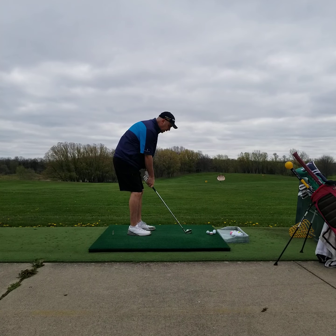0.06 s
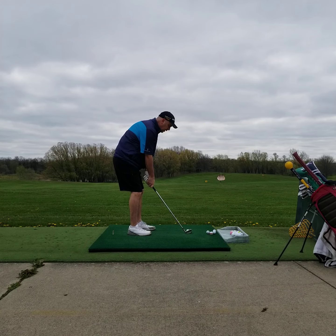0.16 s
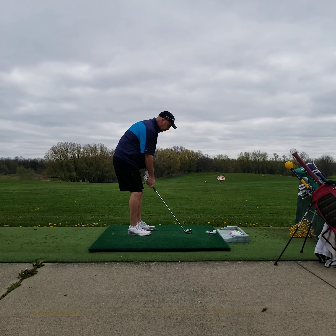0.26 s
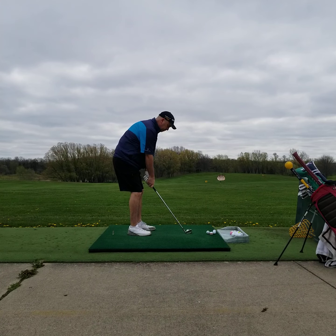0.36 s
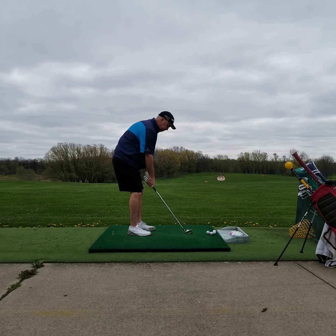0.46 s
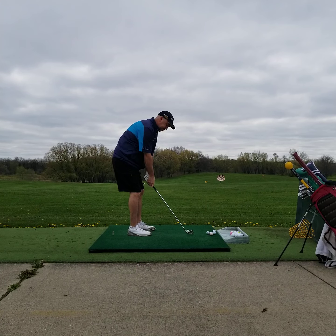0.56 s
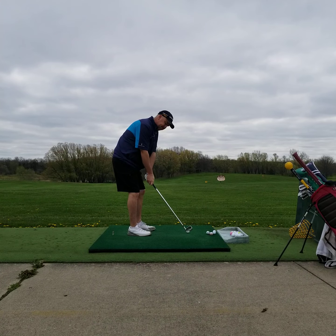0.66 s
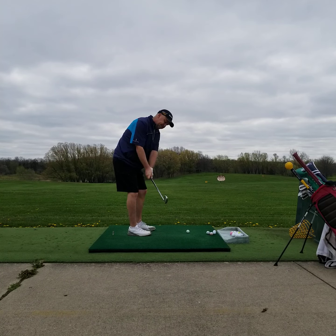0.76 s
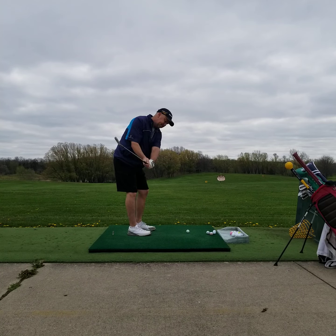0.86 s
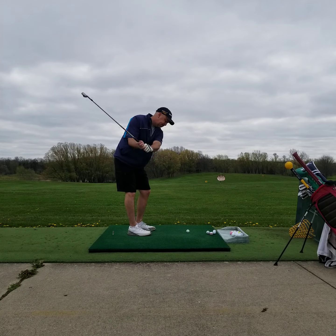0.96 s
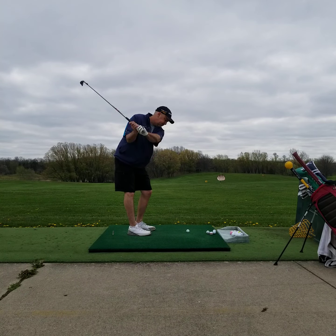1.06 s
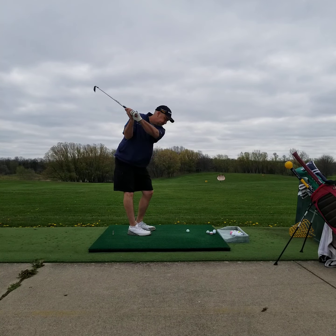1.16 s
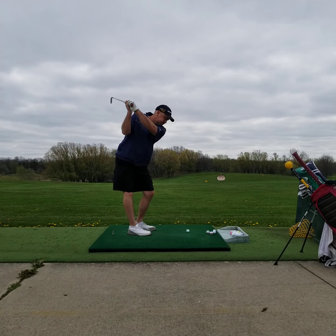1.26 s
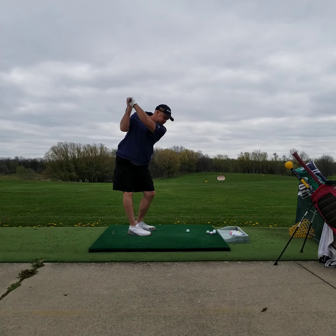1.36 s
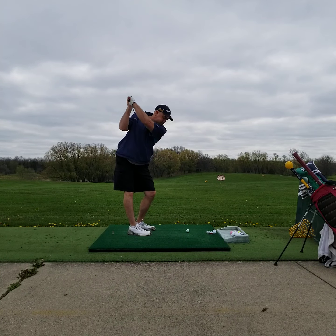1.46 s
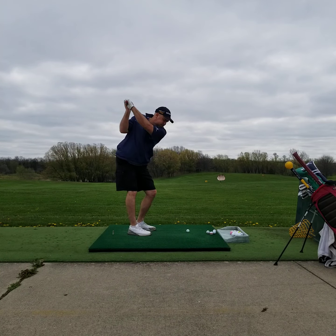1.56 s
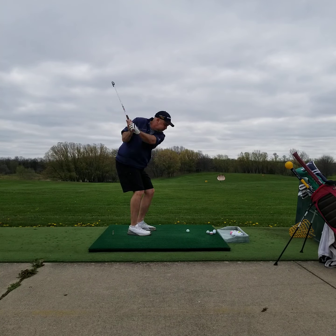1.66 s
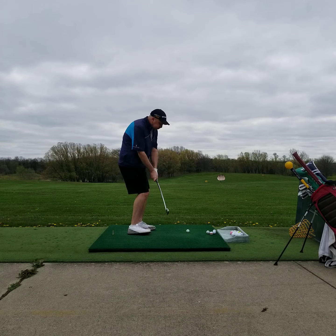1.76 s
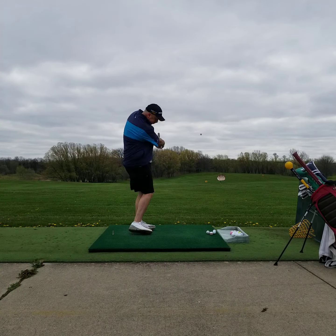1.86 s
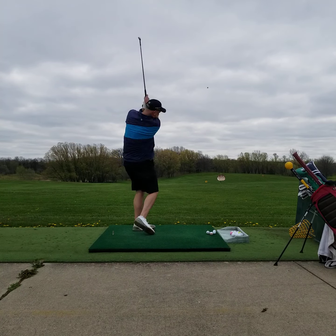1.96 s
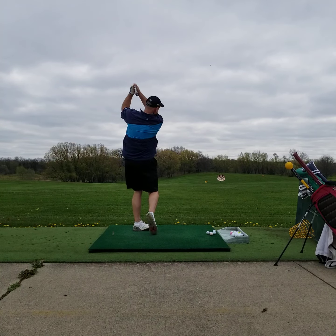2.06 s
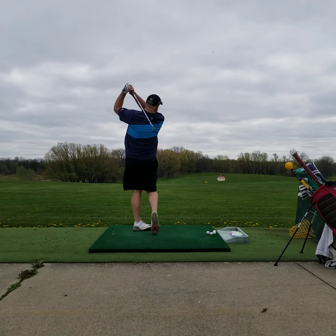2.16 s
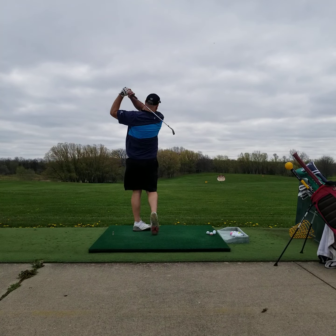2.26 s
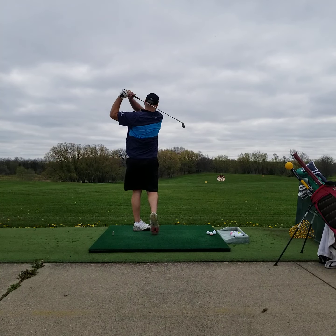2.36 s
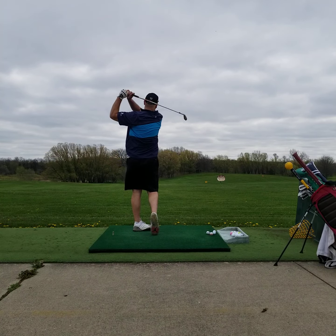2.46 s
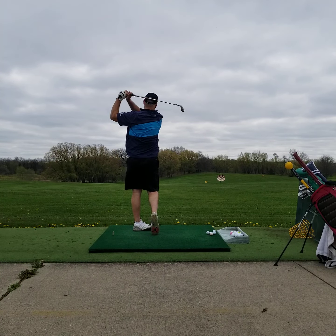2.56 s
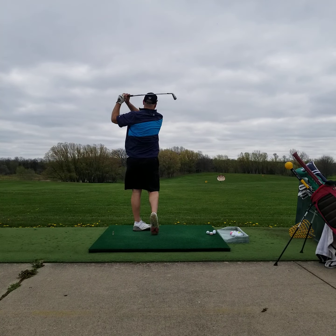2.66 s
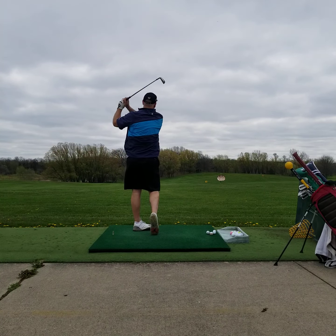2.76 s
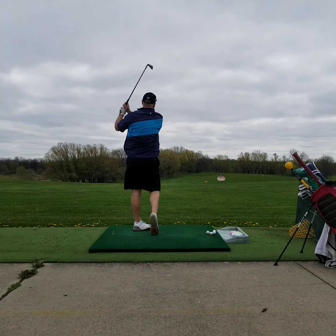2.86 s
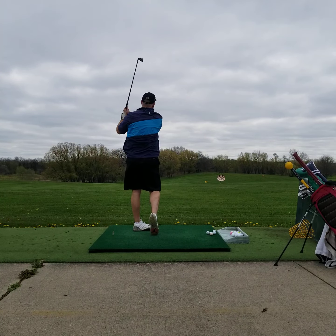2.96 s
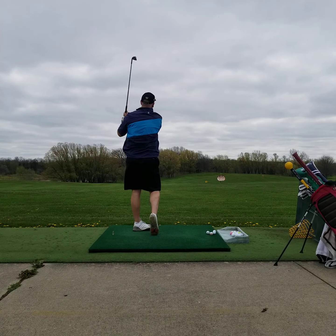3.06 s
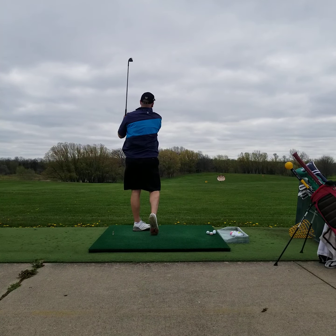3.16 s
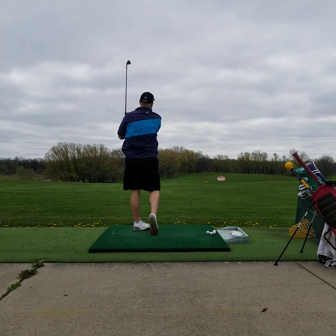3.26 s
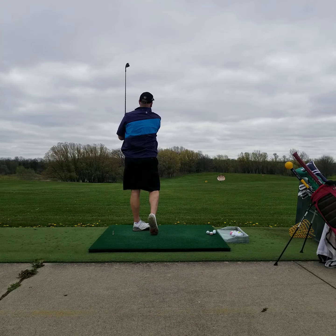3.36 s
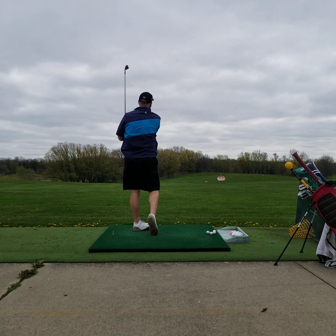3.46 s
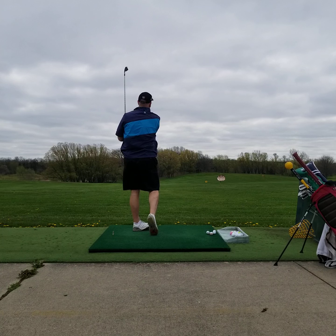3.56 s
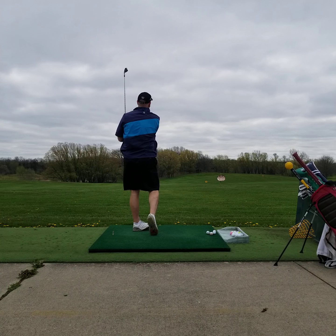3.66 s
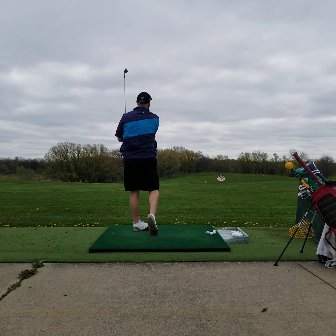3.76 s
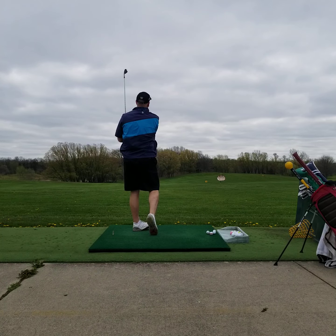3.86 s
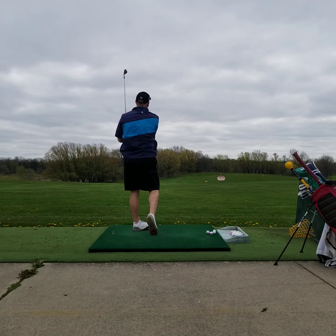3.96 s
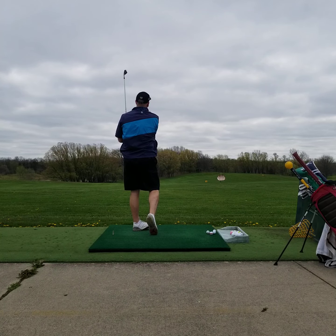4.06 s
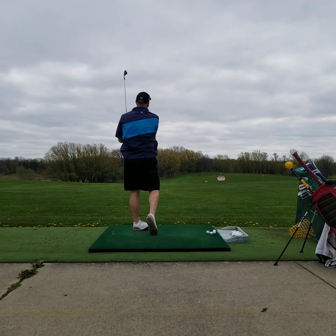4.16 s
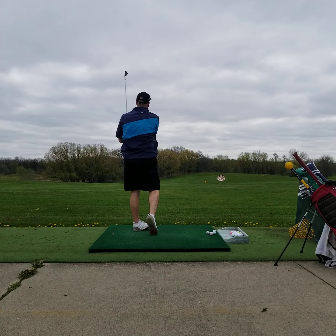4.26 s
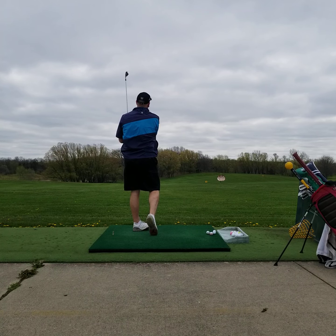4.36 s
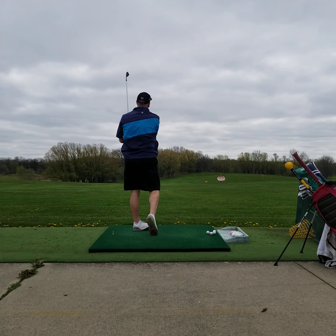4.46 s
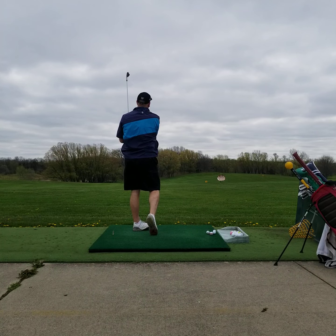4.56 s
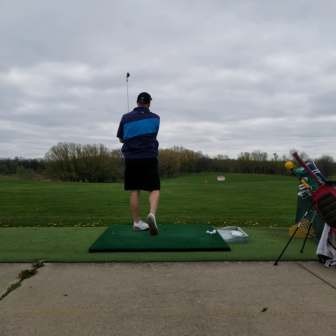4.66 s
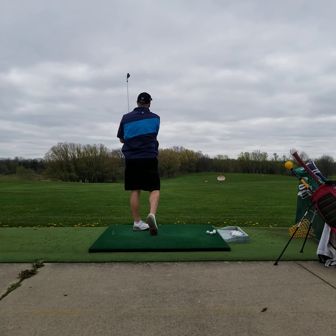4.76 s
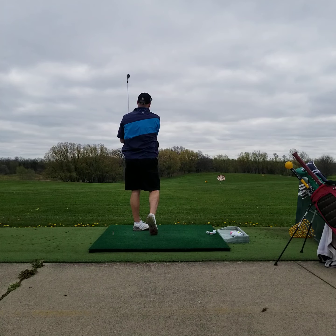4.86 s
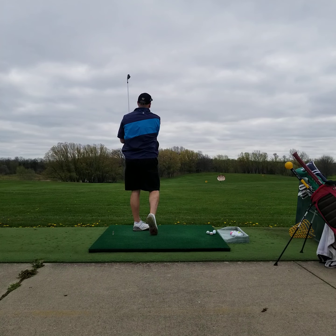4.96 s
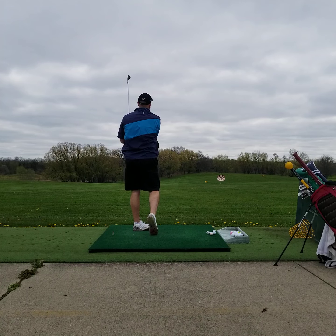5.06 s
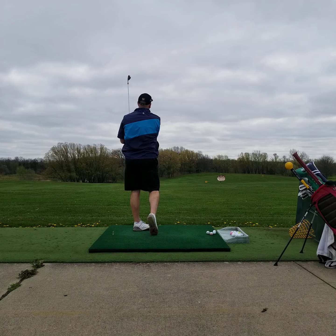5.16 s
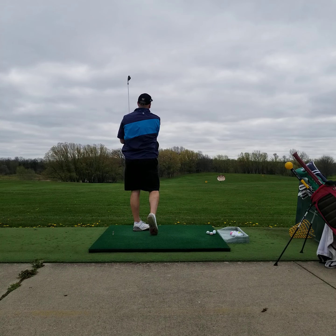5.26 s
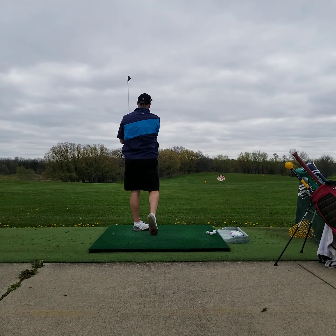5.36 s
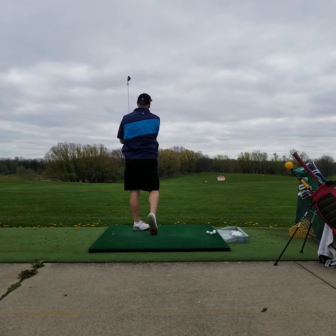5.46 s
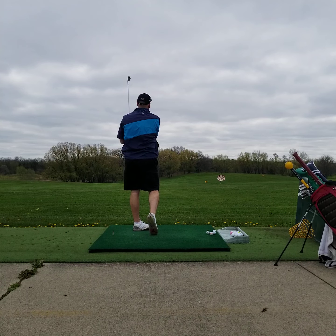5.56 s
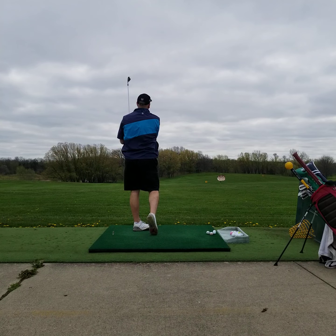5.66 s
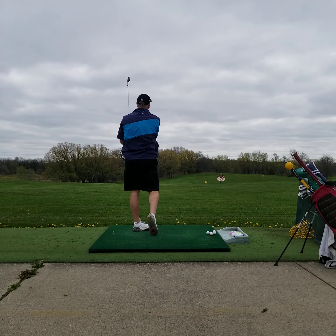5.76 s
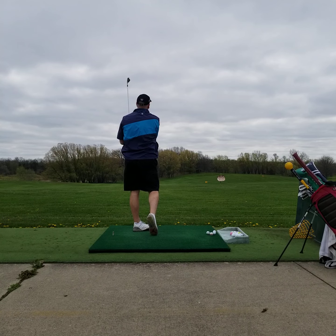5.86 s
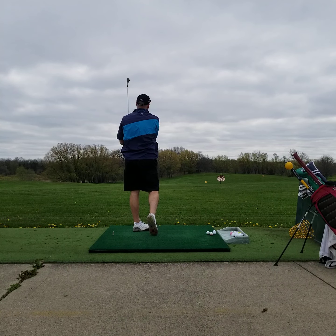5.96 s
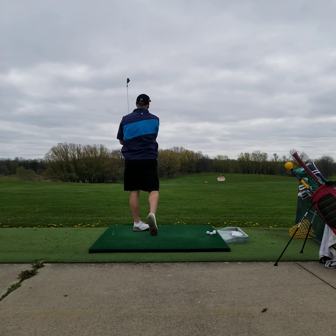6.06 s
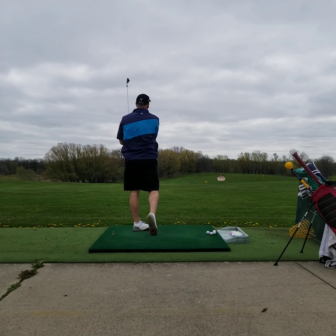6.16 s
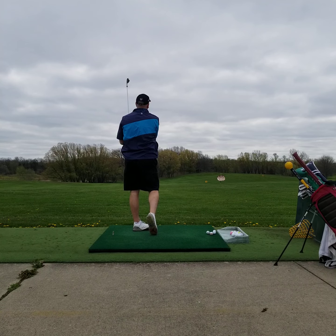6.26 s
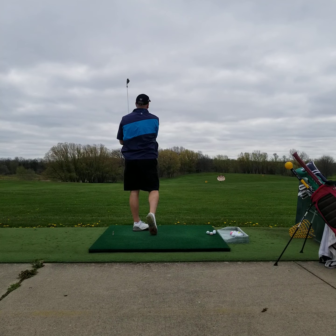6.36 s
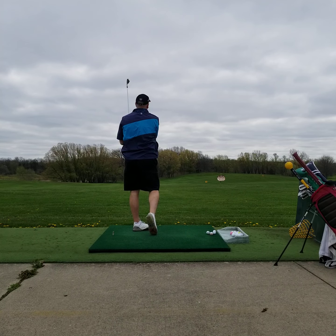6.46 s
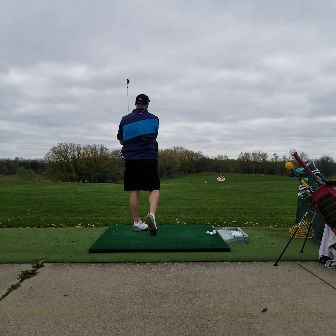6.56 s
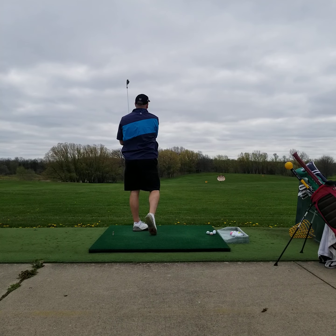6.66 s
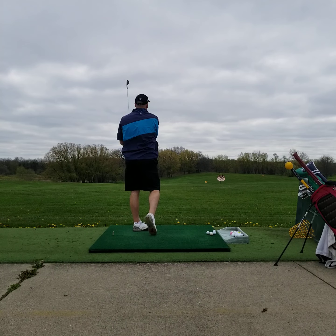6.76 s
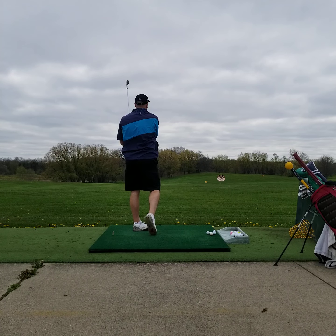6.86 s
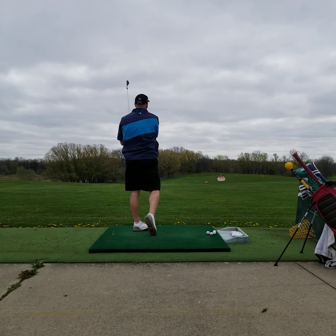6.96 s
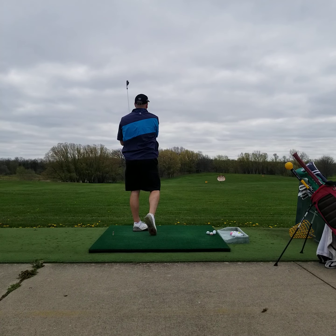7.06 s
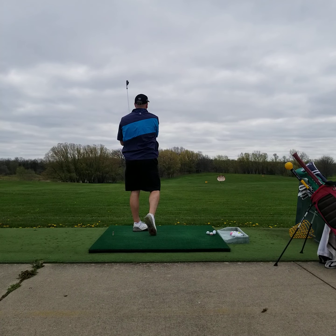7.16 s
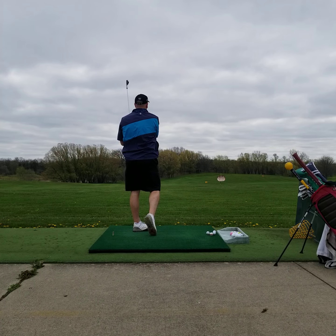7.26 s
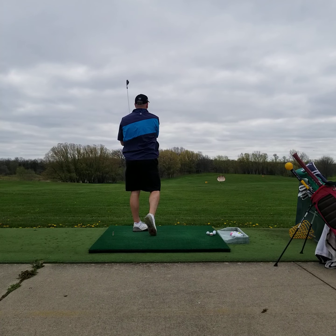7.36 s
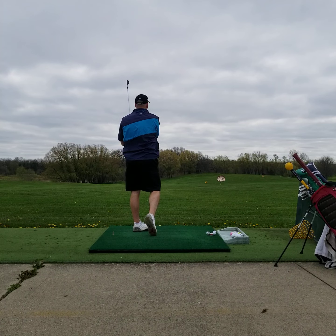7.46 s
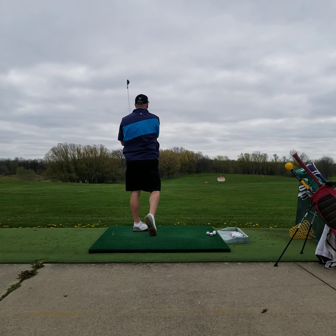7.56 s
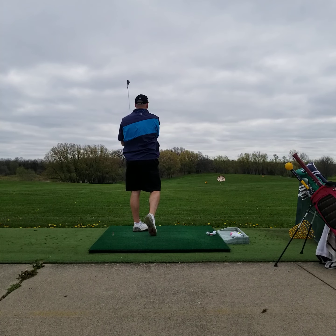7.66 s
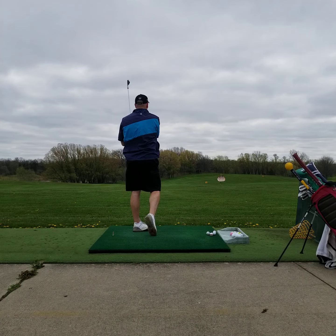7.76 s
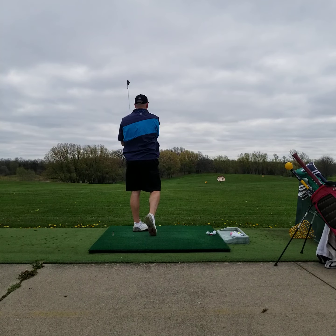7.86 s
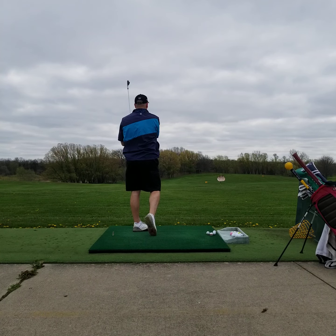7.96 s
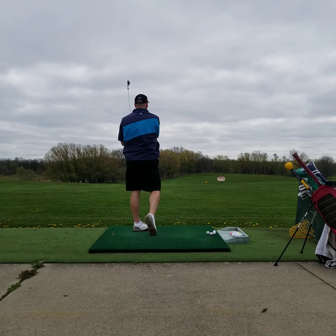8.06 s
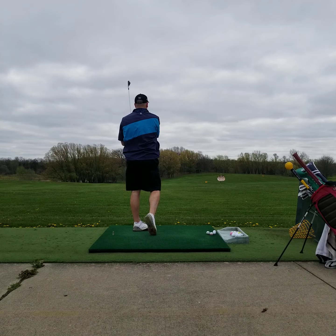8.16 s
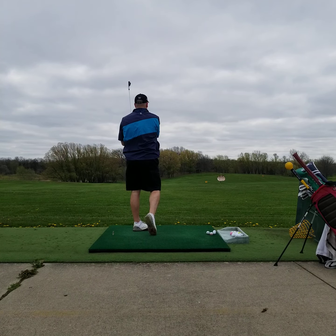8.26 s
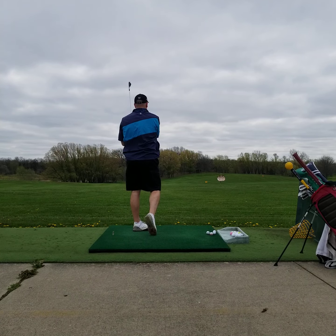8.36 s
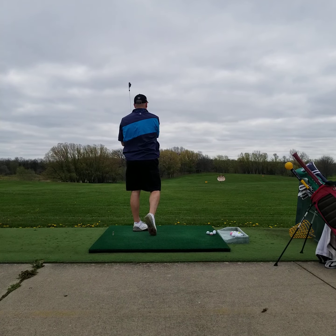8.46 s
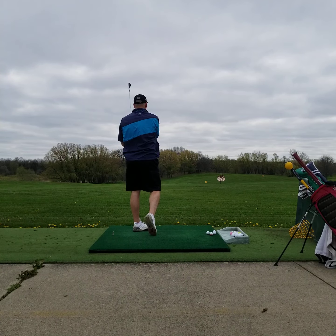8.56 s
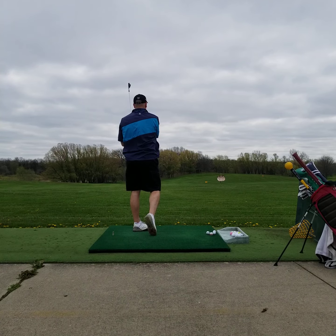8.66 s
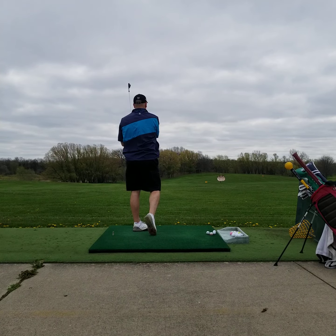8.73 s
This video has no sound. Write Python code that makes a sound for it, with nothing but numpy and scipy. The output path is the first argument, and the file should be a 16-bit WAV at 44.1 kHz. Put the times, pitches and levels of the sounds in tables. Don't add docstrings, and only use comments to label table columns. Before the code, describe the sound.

Quiet outdoor air with soft wind rumble and a faint motor hum. A quick swish leads to a bright, very brief golf ball click with a short mat thud and bristle scrape, dry and close in stereo. Afterwards a cart engine swells steadily from afar, its deep buzz sagging slightly in pitch under blustery low wind thumps, before it accelerates near the end with rattles and rolling tyres.

```python
import sys
import numpy as np
from scipy import signal
from scipy.fft import rfft, irfft
from scipy.io import wavfile
from scipy.ndimage import uniform_filter1d, map_coordinates

SR = 44100
rng = np.random.default_rng(int(sys.argv[2]) if len(sys.argv) > 2 else 0)


def int16_out(signal):
    q = np.round(np.clip(np.atleast_2d(signal).T, -1, 1) * 32767)
    wavfile.write(sys.argv[1], SR, q.astype(np.int16))


def amplitude_ratio(level_db):
    exponent = np.asarray(level_db, float) / 20
    return 10 ** exponent


N = 410571
TIME = np.arange(N) / SR
SLOW = TIME[::64]
FRAME = 1024
TOP_HZ = 15750

# time_s, closeness (0-1)
CLOSENESS = [(0, 0), (2.2, 0.04), (3.1, 0.04), (3.48, 0.35), (3.75, 0.17), (4.08, 0.34), (4.22, 0.6),
             (4.36, 0.59), (5.3, 0.63), (5.9, 0.76), (6.55, 0.8), (6.9, 0.89), (7.2, 1), (8.0, 0.98),
             (8.7, .97), (9.31, 0.96)]
# time_s, level_db
TRAFFIC = [(0, 0), (.7, 3.5), (1.05, 0.5), (1.5, 3), (2.15, -2), (4, -0.5), (9.31, 0.5)]
# time_s, level_db
BREEZE = [(0, 4), (.3, 0), (.84, 6.5), (1.6, 8.5), (2.15, 5.5), (2.6, -0.5), (4, -1), (6.84, 0), (7.07, 3),
          (7.16, 11), (7.38, 5), (7.52, 8), (7.68, 5.5), (8.07, 1), (8.9, 5), (9.12, 9), (9.31, 8)]
# low_hz, high_hz
RUSH_HZ = [(350, 800), (800, 2000), (3500, 7500), (11000, 15500)]
# road_and_air_db, cart_far_db, cart_close_db
RUSH_DB = [
    (-56, -62.5, -39.5),
    (-54.5, -74.5, -41.5),
    (-81.5, -90.5, -65.5),
    (-81.5, -100, -80),
]
BREEZE_SHARE = (0, 0, .4, 1)
ROAD_SHARE = (0.058, 0.99, .3, 0)
# frequency_hz, density_db (per Hz)
FAR = [(71, -29.5), (120, -0.5), (141, -11), (184, -10), (272, -15), (334, -18.5), (524, -21), (789, -19),
       (1580, -23), (3520, -50), (4680, -55.5), (7500, -62.5), (8480, -74), (12300, -56.5), (16000, -54.5)]
# frequency_hz, density_db (per Hz)
NEAR = [(65, -27.5), (110, 1.5), (133, -10), (206, -10.5), (258, -13.5), (384, -16), (1110, -22),
        (1900, -32.5), (2670, -40.5), (3420, -50.5), (4220, -50.5), (7400, -58.5), (8560, -66),
        (13000, -61.5), (16000, -61.5)]
# frequency_hz, side_minus_mid_db
WIDTH = [(60, -11.5), (110, -6), (200, -5.5), (380, -8), (700, -10), (1290, -11.5), (2380, -7),
         (4400, -3.5), (8120, 4), (15000, -0.5)]
# frequency_hz, side_minus_mid_db
NEAR_WIDTH = [(60, -12), (150, -8), (350, -24.5), (700, -17), (1400, -12), (3000, -8), (6000, -0.5),
              (15000, 0.5)]
# frequency_hz, left_minus_right_db
LEAN = [(60, 2.5), (110, 2), (200, 1), (380, 0.5), (700, 1.5), (1290, 1.0), (2380, 0.5), (4400, 4),
        (8120, 5), (15000, 2.5)]
COLOUR_FROM, COLOUR_TO, COLOUR_TOP = 0.63, 0.83, 0.84
RATTLE_REV_DB = 3.5
ROLL_S, ROLL_DB_PER_S, ROLL_LOW_SHARE = 8.745, 10.5, 0.2
# time_s, length_s, change_db
SURGES = [(8.82, .06, 3), (9.02, .06, 2), (9.152, 0.035, 1), (9.203, .04, -2.5), (9.27, .09, 3)]

# time_s, firing_rate_hz, note_db, exhaust_opening (0-1)
ENGINE = [(0, 94.89, -43, 0), (.6, 97.4, -41.5, 0), (1.0, 96.29, -40, 0.22), (1.7, 94.44, -36.5, 0.16),
          (2.3, 94.5, -45.5, 0), (2.9, 94.7, -36, 0.06), (3.85, 93, -35, 0.15), (4.15, 92.65, -28, 0.54),
          (5.25, 90.9, -23.5, 0.58), (6.1, 88.25, -23.5, 0.85), (6.8, 85.32, -26.5, 0.98),
          (7.94, 83.5, -27, .9), (8.05, 99, -21.5, 0.78), (8.16, 125.7, -34, 0.47),
          (8.35, 144.8, -37.5, 0.33), (8.5, 155, -35, 0.73), (8.72, 160.5, -32.5, 0.36),
          (9.31, 162.9, -35.5, 0.1)]
# muffled_db, open_db
OVERTONES = [(-54, -38), (-58, -37), (-70, -44), (-72, -46.5)]
REV_DULL_DB = (5, -7.5, -1, -6)
# low_hz, high_hz
FAST_HZ = (100, 130)
FADE_DB, FAR_FADE_DB = 2, 2
# time_s, length_s, change_db, order
FADES = [(0.057, 0.06, -16, 1), (0.134, 0.03, 6, 1), (0.217, .14, -12, 1), (0.377, 0.11, 6.5, 1),
         (0.52, .1, -3.5, 1), (1.193, 0.31, -9, 1), (1.37, 0.07, 4, 1), (2.23, .12, -13, 1),
         (2.6, .1, -6, 1), (2.97, .08, -3.5, 1), (3.5, 0.066, 4, 1), (3.6, .12, -5, 1),
         (3.87, 0.086, -3.5, 1), (7.2, 0.072, -5, 1), (8.86, 0.048, -10, 1), (.8, 0.66, -8, 2),
         (3.75, 0.14, 7.5, 2), (5.55, .2, -12, 2), (6.1, .2, -6, 2), (7.15, 0.48, -13, 2),
         (1.35, 0.16, 3.5, 3), (4, 0.44, -5, 3), (6.551, 0.22, -7.5, 3), (7.395, 0.33, -11.5, 3),
         (8.95, 0.76, 2.5, 2), (7.5, 0.29, -5.5, 4), (6.3, 0.38, -6, 5), (7.0, 0.84, 3, 5),
         (1.7, .15, 3, 1), (6.3, .1, -3, 1), (7.5, 0.12, -3.5, 1), (4.35, 0.43, 4, 2), (5.85, .14, 6, 2),
         (6.75, .25, 4, 2), (6.9, .2, -4, 2), (8.28, .15, -6, 2), (8.58, 0.2, -6, 2), (3.45, .15, 6, 2),
         (2.75, .2, 4, 2), (3.08, .15, 5, 2), (0.31, 0.19, 5, 3), (2.05, .15, -7, 3), (7.98, .25, 3.5, 2),
         (7.92, .3, 2.5, 3), (7.95, .2, -6, 4), (.57, .1, 5, 3), (1, .15, 4, 3), (7.45, .12, -10, 5),
         (4.8, .4, 2.5, 5), (7.8, .15, -4, 4)]
PATH_SKEW = (0.15, .33, .05, .06, .1)
CLUTCH_S, LOAD_FROM_HZ, LOAD_TO_HZ, SPIN_UP_S = 8.12, 82, 103.5, .28
LOAD_DB, LOAD_RISE_S, LOAD_PEAK_S = (-27.5, -42.5, -47), 0.083, 8.4
LOAD_SAG_DB_PER_S = (-15, -4, -4)

CALM_DB, WINDY_DB, WINDY_S = -49, -43, (4, 6.1)
LULL_DB, LULL_S = 6, (9.1, 9.2)
# time_s, peak_db, length_s
GUSTS = [(0, -43, 0.04), (.1, -48, 0.072), (.6, -36, 0.082), (0.943, -40.5, 0.18), (1.17, -40.5, 0.11),
         (1.349, -35.5, 0.06), (2.05, -43, 0.24), (2.25, -42.5, .08), (3.03, -44, .1), (3.27, -45, .1),
         (3.58, -47, .07), (4.17, -42, .07), (4.32, -34.5, .06), (4.77, -42.5, .08), (4.9, -32, 0.073),
         (5.16, -38.5, 0.11), (5.42, -41.5, .05), (5.57, -40, .1), (5.73, -31.5, 0.053),
         (5.81, -29.5, 0.05), (6.06, -34, .2), (6.45, -33, 0.27), (6.9, -31.5, 0.076), (7.053, -35.5, .15),
         (7.39, -36.5, 0.69), (7.8, -37.5, 0.3), (8.27, -43, .1), (8.92, -38, .12), (9.079, -40, .08)]
# time_s, pitch_hz, level_db, t60_s
POPS = [(.096, 85, -13, 0.055), (.555, 55, -33, .1), (1.975, 70, -32, .05), (2.1, 90, -30, .04),
        (3.21, 75.2, -33, .06)]
# time_s, length_s, depth_db, below_hz
DUCKS = [(1.17, 0.29, -5.5, 450), (1.459, 0.03, -14, 250), (2.25, 0.2, -5, 450), (3.64, 0.049, -8, 350),
         (5.767, 0.037, -15, 170), (6.047, .012, -8, 150), (6.2, .016, -9, 150), (6.322, 0.019, -13, 150),
         (6.375, .02, -7, 150), (6.477, .014, -12, 150), (6.56, 0.04, -14, 300), (6.848, 0.019, -8, 150),
         (6.928, .02, -8, 150), (7.502, 0.016, -17, 300)]

# time_s, level_db, pitch_hz, fade_s
TICKS = [(0, -67, 6000, 0.027), (.011, -66, 5900, .004), (.262, -76, 6800, .008), (.362, -70, 4500, .005),
         (.431, -72, 4800, .005), (.618, -76, 6900, .008), (2.82, -73.5, 6200, .008),
         (6.453, -69, 12000, .006), (6.91, -56, 4200, .01)]
# start_s, length_s, from_hz, to_hz, level_db
BIRD = [(.21, .16, 4150, 3900, -86), (3.58, .11, 5230, 5260, -87), (4.97, .08, 4050, 3980, -84),
        (4.34, .03, 5600, 5900, -80), (4.66, .19, 5350, 5300, -90)]
# start_s, end_s, pitch_hz, width_hz, level_db
WHINES = [(5.6, 7.3, 3300, 400, -71.5), (5.2, 8.8, 4050, 980, -74.5), (8.1, 9.3, 6200, 730, -73.5),
          (8.4, 8.6, 270, 18.05, -47.5), (7.8, 8.16, 410, 27, -50), (8.05, 8.38, 275, 28, -43.5),
          (8.38, 8.75, 325, 15.8, -46.5), (6.5, 7.12, 209, 79, -42), (6.45, 7.32, 390, 50, -44.5),
          (8.95, 9.5, 560, 90, -45.5), (0.75, 1.05, 8000, 3600, -88)]
# start_s, end_s, pitch_hz, width_hz, level_db
MORE_WHINES = [
    (.45, 1.75, 780, 45, -63),
    (8.38, 8.75, 325, 16, -49),
]

# start_s, rise_s, hold_s, fall_db_per_s, whoosh_db, fizz_db
STROKE = [
    (1.647, .012, 0.135, 200, -55.5, -71.5),
    (1.764, 0.012, 0.048, 299.5, -45, -58),
    (1.774, 0.03, 0.011, 899.5, -38, -54),
    (1.8268, 0.0022, 0.004, 2400, -36, -35),
    (1.834, .008, .0135, 3000, -38, -44),
    (1.8265, .003, .009, 500.5, -39, -44),
    (1.853, .005, 0.0026, 300.5, -45, -62),
    (1.86, .02, 0.016, 65, -63, -60.5),
]
# frequency_hz, density_db (per Hz)
SHAFT = [(120, -34.5), (200, -4), (497, -9), (647, -0.5), (937, -16), (1250, -7.5), (1480, -13),
         (3500, -26), (4550, -56.5), (7700, -120)]
# frequency_hz, density_db (per Hz)
WHOOSH = [(120, -33.5), (200, -6.5), (574, 1.5), (1380, -11.5), (1750, -1.5), (2860, -9), (3500, -23),
          (4550, -53.5), (7700, -120)]
# frequency_hz, density_db (per Hz)
FIZZ = [(1760, -37.5), (3000, -7.5), (3660, -11), (5700, -8), (6300, -10), (14900, -10.5), (16500, -12)]
# time_s, length_s, pitch_hz, width_hz, level_db
WHISTLE = (1.806, 0.02, 630, 70, -42)
# time_s, peak_db, pitch_hz, t60_s
CRACKS = [(1.8285, -6.5, 11200, .003), (1.8290, -7, 12700, .0028), (1.8284, -9.5, 15300, .0025),
          (1.8290, -10, 14400, .003), (1.8288, -14, 16200, .002), (1.8287, -15, 9150, .003),
          (1.8296, -17, 7350, .005), (1.8292, -21, 8200, .005), (1.8308, -23, 11800, .006),
          (1.8301, -26, 9500, .004), (1.8304, -22, 14500, .004)]
# time_s, pitch_hz, level_db, t60_s
THUD = [(1.8292, 280, -13, 0.018), (1.8272, 460, -18, .016), (1.8289, 1170, -19, .025),
        (1.8296, 1720, -23, 0.022), (1.8302, 1960, -27, .018), (1.8290, 2290, -21, 0.02),
        (1.8292, 2850, -27, .015), (1.8284, 4360, -19, 0.012), (1.8288, 6450, -26, .005),
        (1.8292, 5600, -22, .006), (1.8288, 3450, -26, .008), (1.832, 650, -26, .015),
        (1.8316, 4900, -24, .008), (1.832, 7000, -27, .008), (1.8286, 5100, -14, .0045)]
# time_s, pitch_hz, level_db, t60_s
MAT = [(1.8255, 1100, -29, .006), (1.8385, 540, -30, .025), (1.851, 1150, -33, .02), (1.851, 300, -29, .03),
       (1.8555, 600, -33, .03), (1.8495, 2950, -38, .02), (1.849, 1750, -36, .025),
       (1.8415, 4410, -37, .04), (1.846, 5570, -40, .03), (1.839, 2300, -35, .03), (1.853, 2730, -39, .02)]
# start_s, end_s, low_hz, high_hz
GAPS = [(1.8165, 1.8225, 3800, 7000), (1.8165, 1.8225, 9000, 11800), (1.8225, 1.8259, 3800, 16500)]
IMPACT_S = 1.826
PORT_LAG_S = .000045
SOLE_PUSH_S = .00016
STOP_FADE_S = .002


def unit(x):
    return x / np.sqrt(np.mean(x ** 2))


def ramp(x, lo, hi):
    return np.clip((x - lo) / (hi - lo), 0, 1)


def power_sum(*db):
    return 10 * np.log10(sum(amplitude_ratio(2 * np.asarray(d)) for d in db))


def curves(rows, t):
    s, *cols = np.transpose(rows)
    return np.array([np.interp(t, s, c) for c in cols])


def shape(points, hz):
    f, db = np.transpose(points)
    return np.interp(np.log(hz + 1), np.log(f), db)


def walk(rate):
    k = int(SR / rate)
    held = np.repeat(rng.standard_normal(N // k + 1), k)
    slewed = uniform_filter1d(uniform_filter1d(held, k), k)
    return unit(slewed[:N])


def coloured(points, width_db):
    hz = np.arange(N // 2 + 1) * SR / N
    gain = amplitude_ratio(shape(points, hz)) * (hz < TOP_HZ)
    mid, side = (unit(irfft(rfft(rng.standard_normal(N)) * gain, N)) for _ in range(2))
    return mid + amplitude_ratio(width_db) * side * np.array([[1], [-1]])


def bump(t, s, length, power):
    return np.exp(-(2 * (t - s) / length) ** power)


def ring(s, hz, t60, rise=.00002):
    out = np.zeros(N)
    near = slice(int(s * SR), int((s + 2 * t60) * SR))
    t = np.maximum(TIME[near] - s, 0)
    decay = np.exp(-np.log(1000) * t / t60)
    out[near] = np.sin(2 * np.pi * hz * t) * decay * (1 - np.exp(-t / rise))
    return out


def fade_db(order):
    bumps = sum(db * bump(SLOW, s, length, 4) for s, length, db, k in FADES if round(k) == order)
    return np.interp(TIME, SLOW, bumps)


def orders(hz, db, jitter, flutter_db):
    speed = uniform_filter1d(hz, size=SR // 20) * (1 + jitter * walk(30))
    phase = 2 * np.pi * np.cumsum(speed) / SR
    out = 0
    for k, level in enumerate(db):
        tone = np.sqrt(2) * amplitude_ratio(level + flutter_db * (1 + 0.6 * k) * walk(32))
        skew = PATH_SKEW[k] * walk(2.3) * np.array([[1], [-1]])
        start = 2 * np.pi * rng.random()
        out = out + tone * np.sin((k + 1) * phase + start + skew + .28 * k * walk(18))
    return out


def cart():
    hz, note_db, opening = curves(ENGINE, TIME)
    far = 1 - ramp(curves(CLOSENESS, TIME)[0], 0, 0.46)
    db = [note_db + FAR_FADE_DB * far * walk(9)]
    for (shut, wide), dull in zip(OVERTONES, REV_DULL_DB):
        exhaust_db = shut + (wide - shut) * opening
        db.append(exhaust_db + dull * ramp(hz, *FAST_HZ) + FADE_DB * walk(7))
    db = [level + fade_db(order=k + 1) for k, level in enumerate(db)]
    engine = orders(hz, db, .005, 0.9)

    since = np.maximum(TIME - CLUTCH_S, 0)
    load_hz = LOAD_TO_HZ + (LOAD_FROM_HZ - LOAD_TO_HZ) * np.exp(-since / SPIN_UP_S)
    from_peak = np.abs(TIME - LOAD_PEAK_S)
    load_db = [top + sag * from_peak for top, sag in zip(LOAD_DB, LOAD_SAG_DB_PER_S)]
    return engine + ramp(since, 0, LOAD_RISE_S) * orders(load_hz, load_db, .012, 1.5)


def rush_levels(t):
    close, road, breeze = curves(CLOSENESS, t)[0], curves(TRAFFIC, t)[0], curves(BREEZE, t)[0]
    roll = ROLL_DB_PER_S * np.maximum(t - ROLL_S, 0)
    roll = roll + sum(db * bump(t, s, length, 2) for s, length, db in SURGES)
    rattle = RATTLE_REV_DB * ramp(curves(ENGINE, t)[0], *FAST_HZ)
    extra = (ROLL_LOW_SHARE * roll, roll, rattle, 0)
    return [power_sum(base + a * road + b * breeze, far + (near - far) * close + more)
            for (base, far, near), a, b, more in zip(RUSH_DB, ROAD_SHARE, BREEZE_SHARE, extra)]


def rush(patch_db=1.1):
    hz, t, noise = signal.stft(rng.standard_normal((2, N)), SR, nperseg=FRAME)
    close = curves(CLOSENESS, t)
    near = COLOUR_TOP * ramp(close, COLOUR_FROM, COLOUR_TO)
    db = shape(FAR, hz)[:, None] * (1 - near) + shape(NEAR, hz)[:, None] * near

    lift = []
    for want, (lo, hi) in zip(rush_levels(t), RUSH_HZ):
        band_power = np.sum(amplitude_ratio(2 * db[(hz >= lo) & (hz < hi)]), axis=0) * 2 / FRAME
        lift.append(want - 10 * np.log10(band_power))
    place = np.interp(np.log(hz + 1), np.log(np.mean(RUSH_HZ, axis=1)), np.arange(4))
    grid = np.meshgrid(place, np.arange(len(t)), indexing="ij")
    db = db + map_coordinates(lift, grid, order=1)

    patches = uniform_filter1d(rng.standard_normal(db.shape), size=40, axis=0)
    patches = uniform_filter1d(patches, size=5, axis=1)
    noise = noise * amplitude_ratio(db + patch_db * unit(patches))

    width_db = shape(WIDTH, hz)[:, None] * (1 - close) + shape(NEAR_WIDTH, hz)[:, None] * close
    mid, side = noise[0], noise[1] * amplitude_ratio(width_db)
    audible = (hz < TOP_HZ)[:, None]
    lean = amplitude_ratio(shape(LEAN, hz) / 2)[:, None] * audible
    ports = np.array([(mid + side) * lean, (mid - side) * audible / (lean + 1e-9)])
    return signal.istft(ports, SR, nperseg=FRAME)[1][:, :N]


def gust_db():
    gusts = power_sum(*(db - 12 * np.abs(2 * (SLOW - s) / length) ** 1.4 for s, db, length in GUSTS), -120)
    steady = CALM_DB + (WINDY_DB - CALM_DB) * ramp(TIME, *WINDY_S) - LULL_DB * ramp(TIME, *LULL_S)
    return power_sum(steady + 3 * walk(10), np.interp(TIME, SLOW, gusts))


def wind():
    buffet = coloured([(15, -36.0), (30, -10.5), (48, 2.5), (70, 6.5), (110, -3.5), (145, -20), (200, -24),
                       (900, -100)], -5.0)
    swell = np.sqrt(uniform_filter1d(np.mean(buffet, axis=0) ** 2, size=SR // 14))
    pops = sum(amplitude_ratio(db) * ring(s, hz, t60, 0.0054) for s, hz, db, t60 in POPS)
    return pops + buffet / (swell + 0.084) * amplitude_ratio(gust_db() + 5.0 + 0.92 * walk(14))


def ticks():
    burst = rng.standard_normal((2, N))
    out = 0
    for s, db, hz, fade in TICKS:
        band = signal.butter(6, [0.56 * hz, 1.2 * hz], "band", fs=SR, output="sos")
        decay = (TIME > s) * np.exp(-np.maximum(TIME - s, 0) / fade)
        out = out + amplitude_ratio(db + 11.5) * signal.sosfilt(band, burst * decay)
    return out


def bird():
    out = np.zeros(N)
    for s, length, from_hz, to_hz, db in BIRD:
        along = np.clip((TIME - s) / length, 0, 1)
        hz = from_hz + (to_hz - from_hz) * along + 25 * walk(40)
        phase = 2 * np.pi * np.cumsum(hz) / SR
        breath = np.sqrt(np.abs(np.sin(np.pi * along))) * (along < 1)
        out += amplitude_ratio(db + 3.5 + 4 * walk(30)) * breath * np.sin(phase)
    return out


def whines(rows):
    out = 0
    for start, end, f, w, top in rows:
        on = np.exp(-((2 * TIME - start - end) / (end - start)) ** 4)
        peak = [(f - 2 * w, -60), (f - w, -18), (f, 0), (f + w, -18), (f + 2 * w, -60)]
        out = out + on * amplitude_ratio(top + 2.2 * walk(15)) * coloured(peak, -19)
    return out


def stroke():
    power = 0
    for s, rise, hold, fall, whoosh_db, fizz_db in STROKE:
        env = ramp(TIME, s, s + rise) * amplitude_ratio(-fall * np.maximum(TIME - s - rise - hold, 0))
        power = power + (env * amplitude_ratio(np.array([[whoosh_db], [fizz_db]]))) ** 2
    return np.sqrt(power)


def swing():
    whoosh, fizz = stroke()
    bristles = amplitude_ratio(2.5 * walk(500) * np.exp(-((TIME - 1.845) / 0.059) ** 2))
    body = np.where(TIME < IMPACT_S, coloured(SHAFT, -11), coloured(WHOOSH, -12))
    out = bristles * (whoosh * body + fizz * coloured(FIZZ, -1.7))

    s, length, hz, width, db = WHISTLE
    singing = coloured([(hz - 2 * width, -50), (hz, 0), (hz + 2 * width, -50)], -12)
    out += amplitude_ratio(db) * bump(TIME, s, length, 2) * singing

    for ch, side in enumerate((1, -1)):
        lag = side * PORT_LAG_S
        for s, db, hz, t60 in CRACKS:
            port_db = side * (1 - 2.5 * ramp(hz, 11000, 13000))
            out[ch] += amplitude_ratio(db) * ring(s + lag, hz * (1 - .005 * side), t60) * amplitude_ratio(port_db)
        for s, hz, db, t60 in list(THUD) + list(MAT):
            out[ch] += amplitude_ratio(db) * ring(s + lag, hz, t60, SOLE_PUSH_S)
    return out


def duck(dry):
    lost = np.zeros_like(dry)
    for s, length, db, hz in DUCKS:
        near = slice(int((s - length - .1) * SR), int((s + length + .1) * SR))
        bass = signal.sosfiltfilt(signal.butter(2, hz, fs=SR, output="sos"), dry[:, near])
        lost[:, near] += (1 - amplitude_ratio(db * bump(TIME[near], s, length, 4))) * bass
    return dry - lost


def scene():
    background = rush() + cart() + wind()
    return background + ticks() + bird() + whines(MORE_WHINES) + swing() + whines(WHINES)


def low_pass(x):
    return signal.sosfilt(signal.butter(12, 16990, fs=SR, output="sos"), x)


def record(dry):
    out = duck(dry)
    for start, end, lo_hz, hi_hz in GAPS:
        sos = signal.butter(6, [lo_hz, hi_hz], "band", fs=SR, output="sos")
        gap = uniform_filter1d(1. * ((TIME > start) & (TIME < end)), size=40)
        out = out - signal.sosfiltfilt(sos, dry) * gap
    out = out * ramp(N / SR - TIME, 0, STOP_FADE_S)
    edge = signal.ellip(10, .2, 60, 16750, fs=SR, output="sos")
    return low_pass(signal.sosfiltfilt(edge, out))


dry = scene()
out = record(dry)
int16_out(out)
```